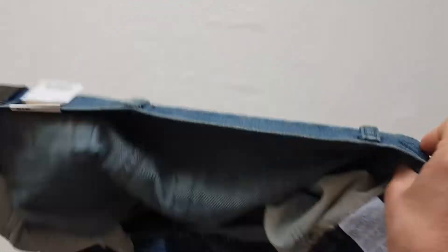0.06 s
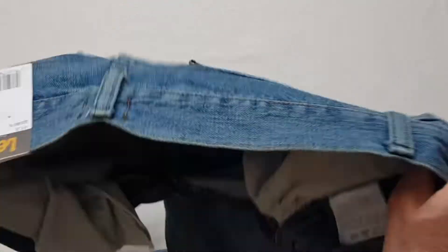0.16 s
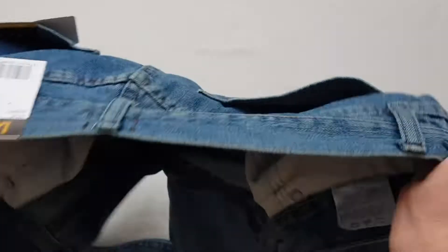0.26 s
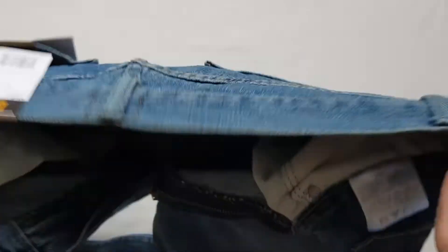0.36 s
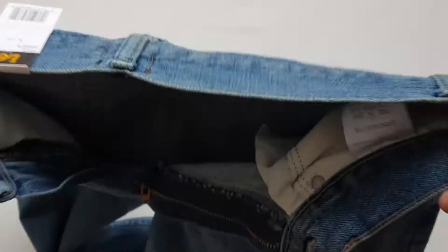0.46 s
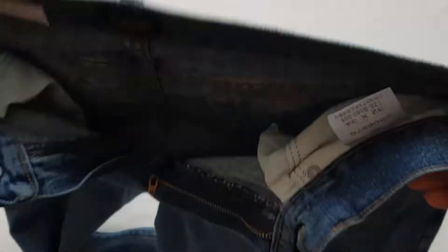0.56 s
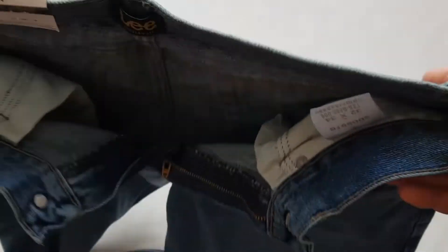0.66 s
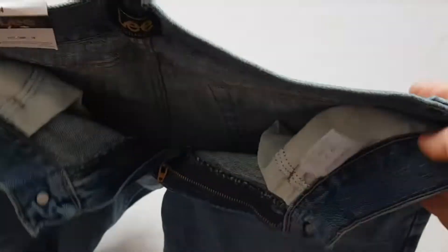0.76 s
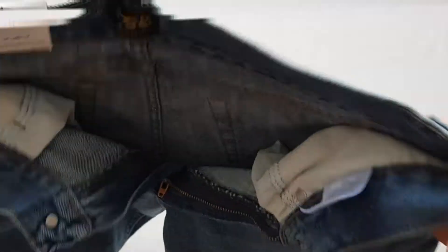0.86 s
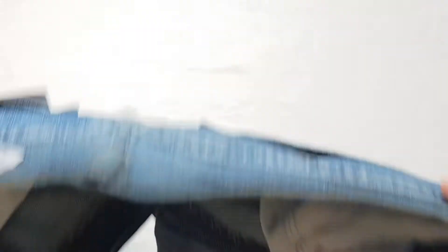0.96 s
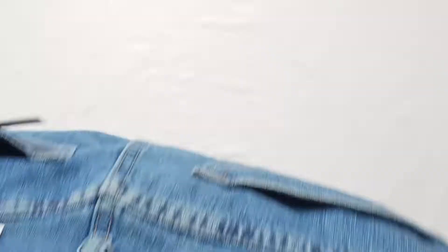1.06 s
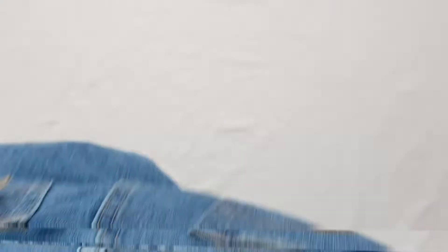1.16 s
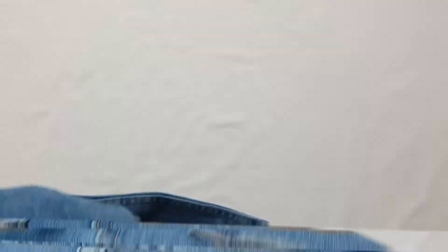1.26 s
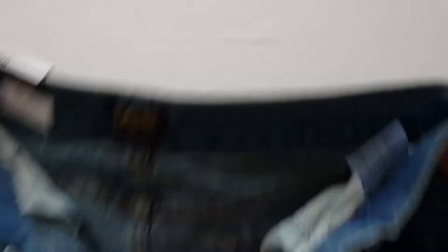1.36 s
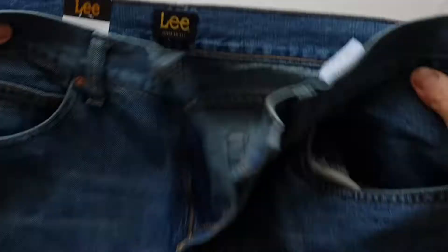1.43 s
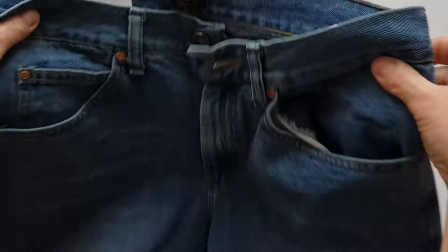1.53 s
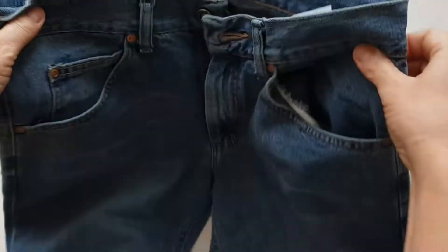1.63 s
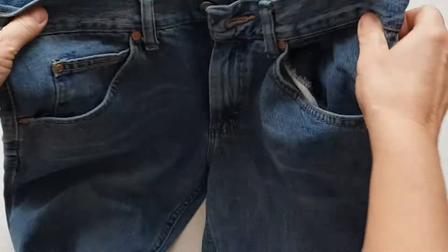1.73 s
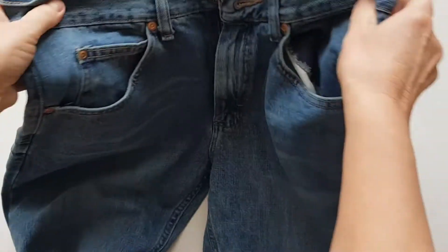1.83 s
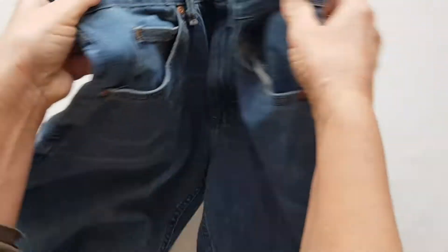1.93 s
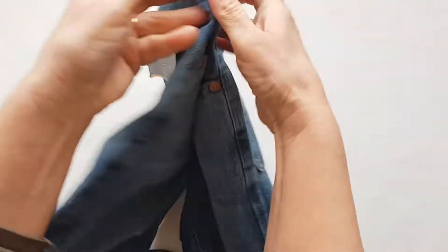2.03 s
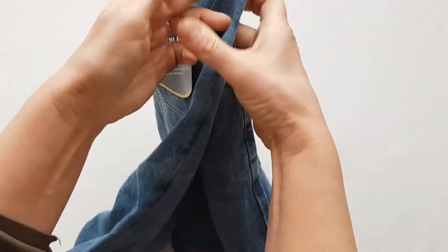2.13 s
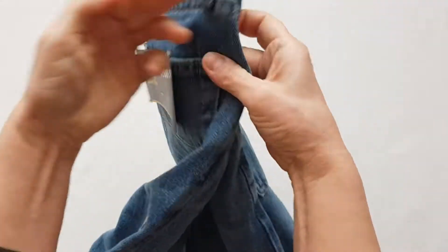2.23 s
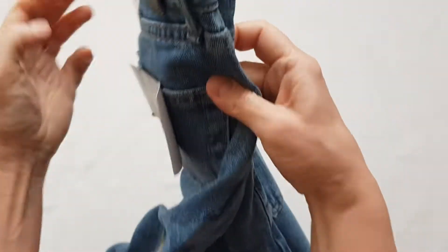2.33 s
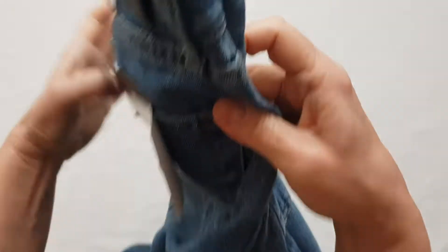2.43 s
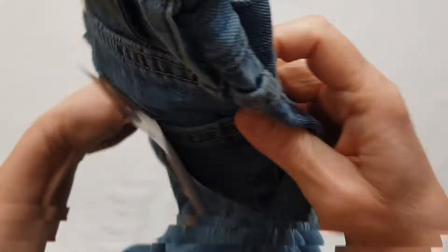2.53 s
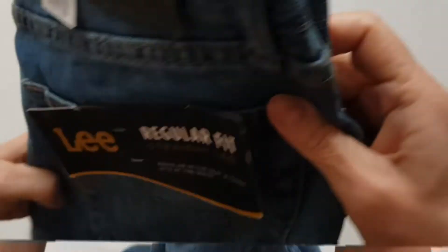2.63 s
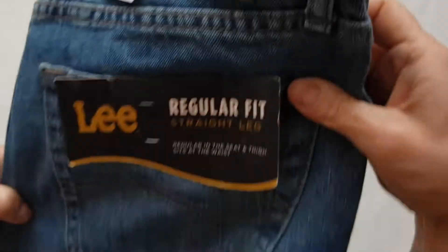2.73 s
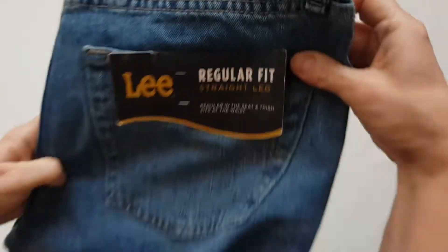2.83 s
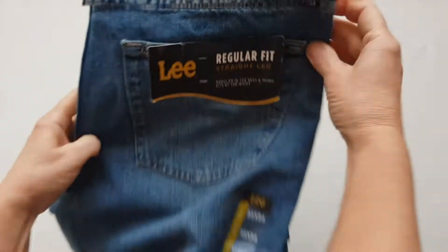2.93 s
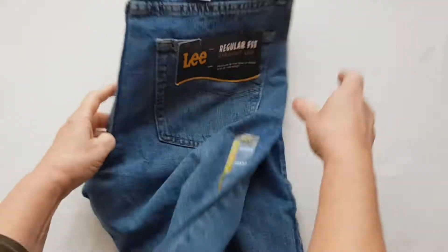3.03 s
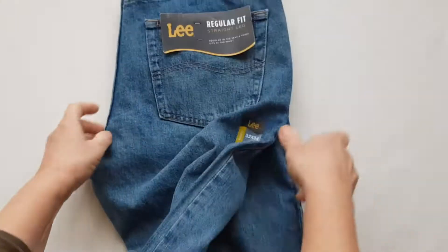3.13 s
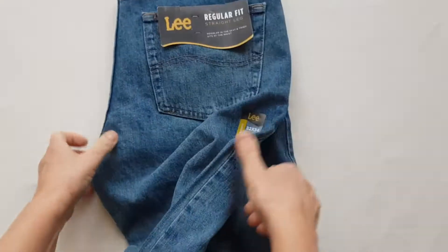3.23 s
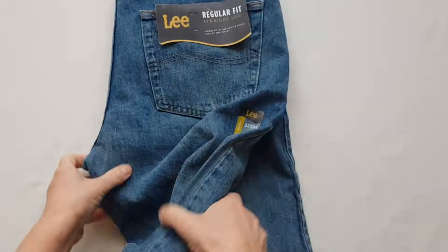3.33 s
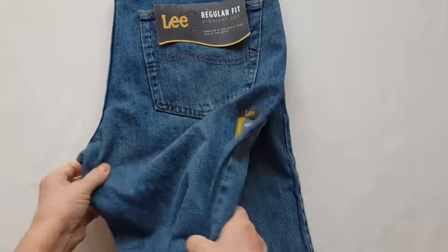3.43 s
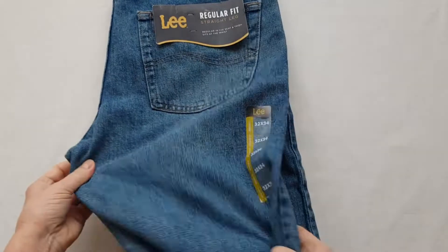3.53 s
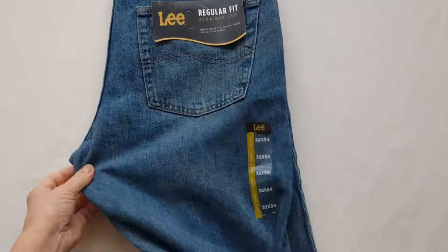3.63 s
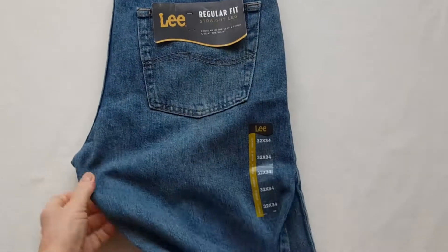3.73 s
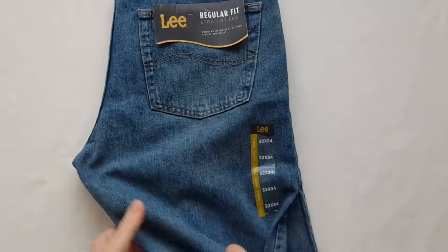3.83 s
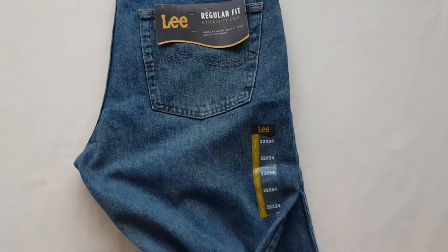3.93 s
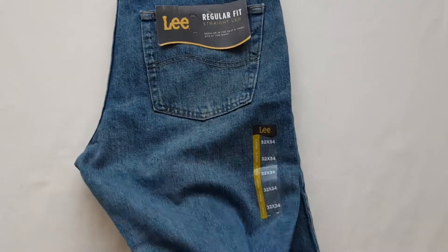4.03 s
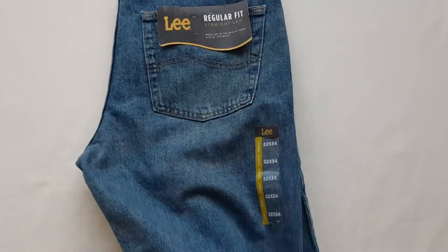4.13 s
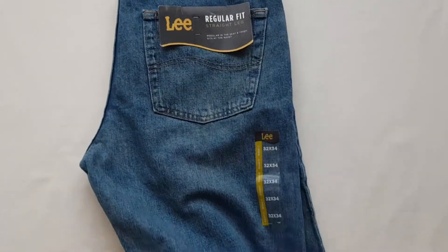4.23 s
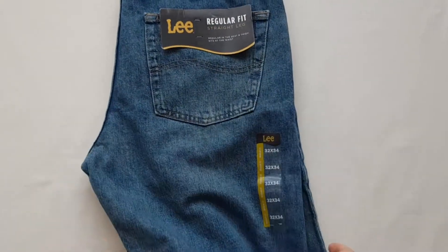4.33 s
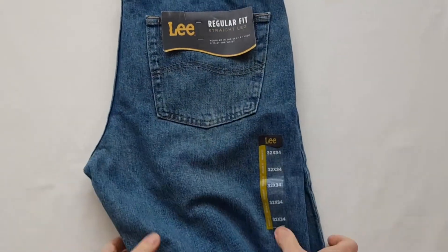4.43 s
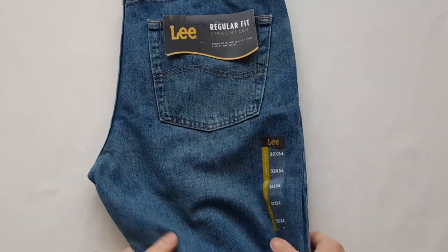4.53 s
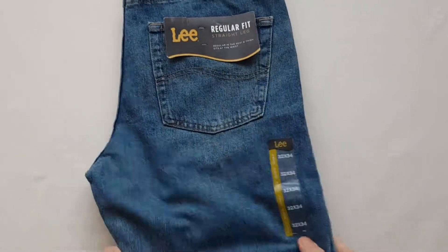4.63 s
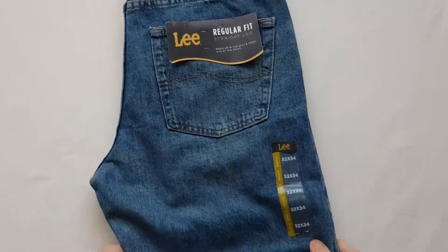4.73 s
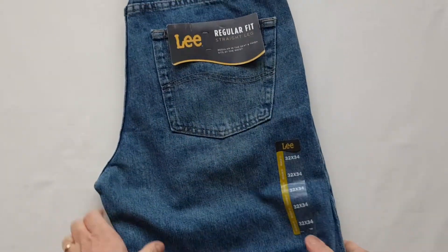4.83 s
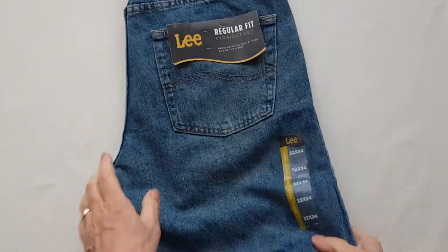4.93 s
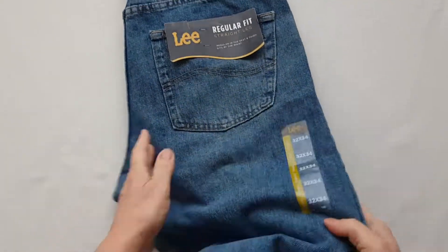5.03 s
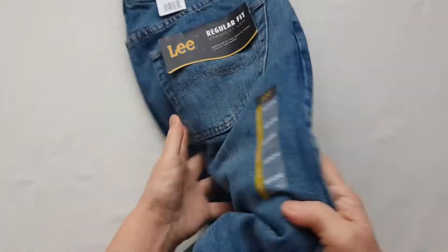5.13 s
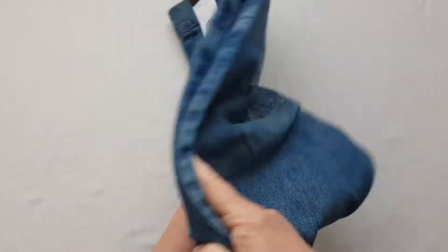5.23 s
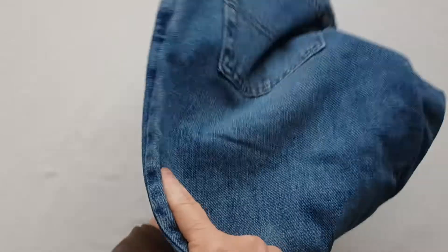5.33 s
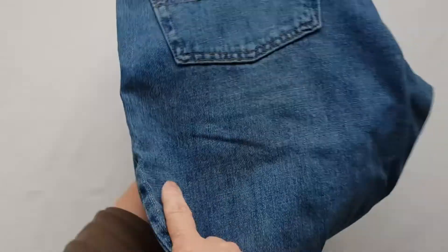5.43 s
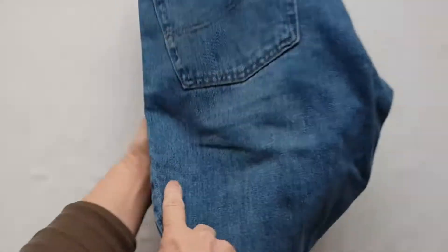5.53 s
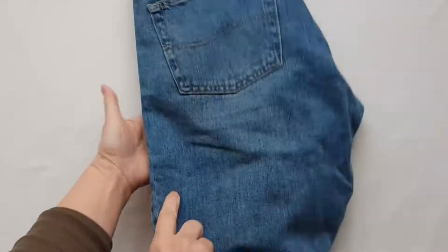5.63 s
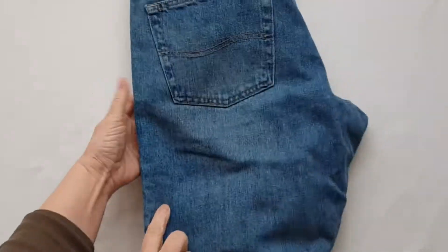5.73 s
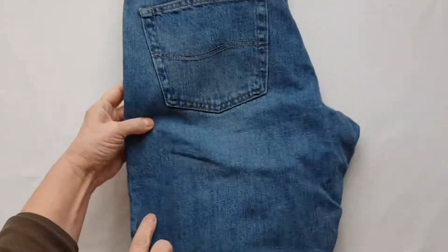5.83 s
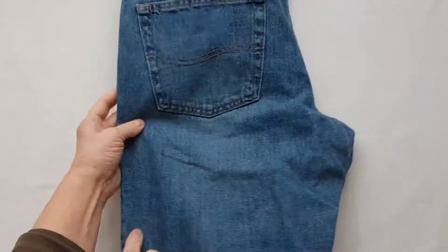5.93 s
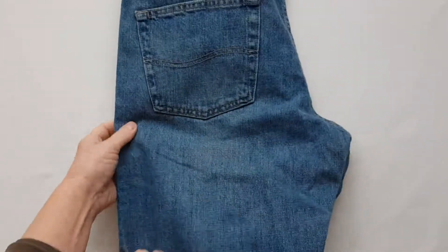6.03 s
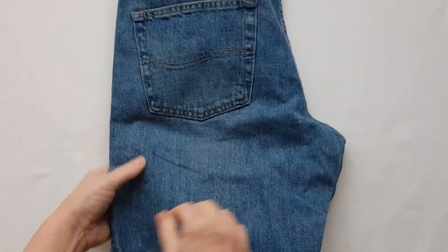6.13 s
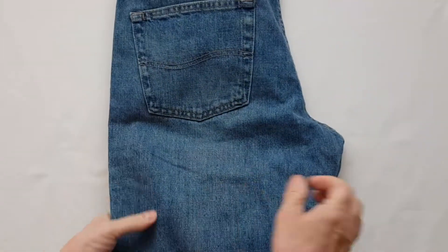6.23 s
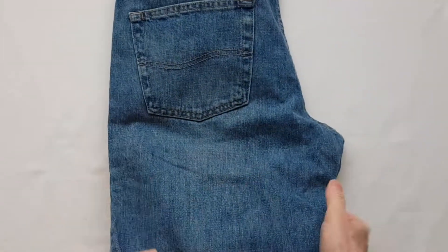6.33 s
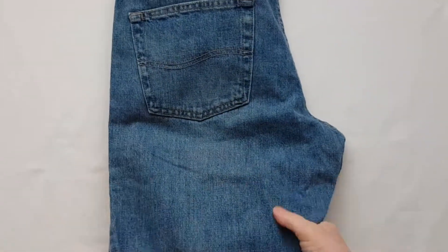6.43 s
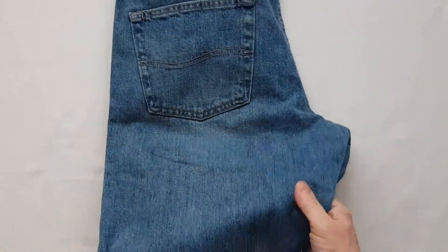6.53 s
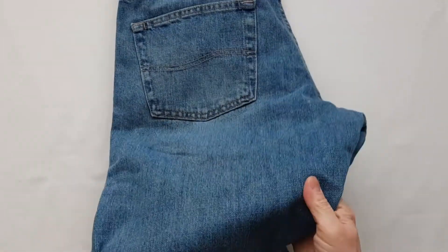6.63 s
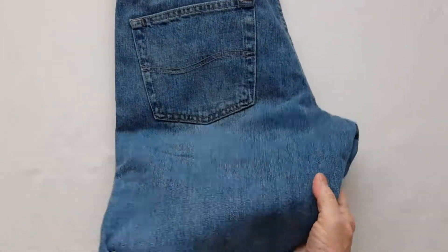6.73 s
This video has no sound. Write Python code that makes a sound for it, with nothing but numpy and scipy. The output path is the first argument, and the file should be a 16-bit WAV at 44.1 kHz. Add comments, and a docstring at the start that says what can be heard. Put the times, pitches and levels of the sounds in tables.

```python
"""Heavy denim on a wooden table

Place: a furnished room with a faint noise floor; microphone: the stereo pair of a camera.
Denim trousers are shaken, folded, dropped and smoothed on the table top. Their weight and the drag of folds
are shaped noise ringing the wood's resonances; scrape, weave hiss and rib rasps are noise heard directly.
Knuckles, folds and seams knock as swelling wavelets; rivets and zip tick as decaying sines with crackle.
The room answers with noise that dies at its own speed at each frequency."""
import sys
import numpy as np
from scipy import signal
from scipy.fft import rfft, irfft, next_fast_len
from scipy.io import wavfile
from scipy.ndimage import uniform_filter1d

SR = 44100
rng = np.random.default_rng(int(sys.argv[2]) if len(sys.argv) > 2 else 0)


def waveform_to_disk(signal):
    """Save audio, clipped to [-1, 1], as 16-bit WAV at the path in sys.argv[1]."""
    frames = np.transpose(np.atleast_2d(signal))
    scaled = np.clip(frames, -1, 1) * 32767
    samples = np.round(scaled).astype(np.int16)
    wavfile.write(sys.argv[1], SR, samples)


def to_linear_factor(level_db):
    """Convert decibel levels (scalar or array-like) to linear amplitude factors."""
    exponent = np.asarray(level_db, float) / 20
    return 10 ** exponent


N = 298998  # samples, 6.78 s

# Event levels stand ahead of the trims in the source functions; spectrum levels are relative.
# The quiet room's spectrum: freq_hz, level_db
HUSH_SPECTRUM = [(15, -32), (25, -28), (97, -1), (226, 7), (296, 8), (1030, -3), (1600, 2.5), (2820, -4),
                 (4860, -38), (6210, -39.5), (12200, -3.5), (15200, -5.5), (16500, -2)]
HUSH_DB = -72
# Decay of the room's echo: freq_hz, t60_s
ROOM_DECAY = [(60, 0.71), (400, 0.37), (1500, 0.47), (4000, 0.39), (12000, 0.073)]
# Likeness of the two channels: freq_hz, correlation (0 to 1)
LIKENESS = [(60, .95), (300, .93), (600, .78), (1500, .12), (4000, 0)]
# Colour difference of the microphone pair: freq_hz, left_over_right_db
MIC_LEAN = [(60, 2.5), (500, 3), (1290, 0), (2400, 1), (4400, 2.5), (8100, 7), (15000, 3.5)]
TOP_HZ = 15770  # nothing is heard above

# Resonances of the table top: pitch_hz, width_hz, level_db
TABLE_MODES = [(56, 13, -1.5), (121.9, 13.2, 9.5), (172.2, 26.2, 2.5), (205.3, 54.6, -1), (246.5, 31, -2),
               (289, 6, 0), (380, 40.6, -4), (505.3, 25.4, -2), (556, 130, -10), (802, 266, -8),
               (1040, 590, -8.5), (1500, 700, -5.5), (2060, 290, -14)]

# Ticks of rivets and zip: start_s, level_db, ring_db and crackle_db (both added to level_db)
TICKS = [(0.0794, -49.5, 10, -2), (0.8984, -64, 15, -8), (1.037, -38, 12, -19), (1.239, -53, 13, -1),
         (1.4618, -36.5, -9, 3), (1.6014, -53, -3, -16), (2.094, -47.5, -6, -26), (3.061, -43.5, -9, -8),
         (3.534, -45, -5, -19)]
# Dull snap, then high ring, of a small metal part: pitch_hz, level_db, t60_s
RIVET_MODES = [(3510, 17, 0.0016), (11200, -3, 0.0053)]
# Rasps across the twill ribs: start_s, length_s, level_db, pitch_hz
RASPS = [(0.71, 0.15, -60.5, 2220), (1.125, .06, -54, 2250), (6.3, 0.17, -65, 1680),
         (1.976, 0.084, -55.5, 1560), (4.445, 0.055, -53.5, 1780), (5.583, 0.041, -47.5, 2300)]

# Knuckles and folds knocking the table: peak_s, level_db, pitch_hz
KNOCKS = [(.02, -30, 350), (.057, -40, 314), (.145, -33, 780), (.149, -36, 365), (.172, -27.5, 386),
          (.186, -36.5, 550), (.285, -39, 385), (.357, -36, 735), (.391, -37.5, 454), (1.17, -47.5, 530),
          (1.42, -51, 614), (1.434, -37, 304), (1.45, -25.5, 302), (1.467, -26, 426), (1.487, -36, 393),
          (2.094, -41.5, 396), (2.544, -27.5, 500), (2.558, -53, 490), (3.028, -32, 457), (3.066, -29, 420),
          (3.086, -32, 438), (3.1, -28.5, 527), (3.115, -28.5, 483), (3.165, -31, 354), (3.533, -16.5, 406),
          (3.612, -31.5, 555), (3.651, -34, 466), (3.71, -40.5, 308), (4.201, -46, 520), (4.565, -37, 624),
          (4.6, -35.5, 780), (4.635, -39.5, 494), (4.66, -39.5, 674), (4.958, -47.5, 500), (5.06, -48, 468),
          (5.623, -33.5, 480), (5.629, -33, 855), (5.64, -24, 376), (5.66, -40, 800), (5.983, -38.5, 388),
          (6.553, -45.5, 520)]
# Stiff seams snapping against the wood: peak_s, level_db
SNAPS = [(0.1733, -42), (1.4656, -24.5), (1.4783, -41), (2.0279, -35), (2.035, -33.5), (2.0954, -34),
         (2.5421, -27.5), (3.0635, -37), (3.102, -30), (3.1162, -27), (3.5339, -32), (3.612, -40),
         (4.4463, -37.5), (4.5636, -37.5), (4.6576, -33.5), (5.6384, -43), (6.354, -42.5), (6.455, -42)]
SNAP_HZ = 1560
RISE_CYCLES = 1.1  # a soft contact peaks after about one cycle of its pitch
# Small knocks of dragged folds: rate, loudest level over the drag, middle pitch
PATTER_PER_S, PATTER_DB, PATTER_HZ = 25, 10.5, 520

# Cloth landing on the table, and slow swells of low rumble while it is handled:
# thud_s, weight_db, air_db, rise_s, fall_s (swells() limits rise and fall)
DROPS_AND_RUMBLE = [(0.011, -37.5, -40, 0.14, 0.17), (0.175, -35.5, -46, 0.044, 0.29),
                    (.217, -53, -32, 0.033, 0.088), (0.329, -40, -44, 0.059, 0.19),
                    (0.699, -65.5, -70.5, 0.57, .8), (1.189, -64, -59, .13, 0.14),
                    (1.365, -47.5, -62, 0.074, 0.03), (1.46, -35, -35.5, 0.11, 0.076),
                    (1.595, -46.5, -63, 0.064, 0.048), (2.0, -47, -60, 0.049, 0.33),
                    (2.543, -54.5, -60, 0.033, 0.35), (3.056, -35.5, -55, 0.053, 0.25),
                    (3.113, -28, -44, 0.1, 0.17), (3.189, -52, -48.5, .08, 0.14),
                    (3.261, -52, -53, 0.068, 0.32), (3.529, -46, -44, 0.038, .07),
                    (3.664, -53, -56, 0.35, 0.19), (4.098, -70, -72, 0.88, .6),
                    (4.433, -55.5, -83, .012, .2), (4.455, -44.5, -75, .04, 0.37),
                    (4.719, -62, -75, 0.23, 1.2), (5.541, -53, -70, .03, .2), (5.642, -33, -62, 0.15, 0.25),
                    (5.685, -45, -41, 0.059, 0.063), (5.778, -47.5, -62, 0.033, 0.2),
                    (5.988, -42, -77, 0.05, 0.26), (6.385, -60, -74, 0.034, .3)]
SETTLE_S, THUD_DB, THUD_HZ = 0.002, 4, 145  # full weight after the thud; thud over the weight
WEIGHT_LOSS_DB, AIR_LOSS_DB = 31.5, 28.5  # lost over one rise or fall
REST_WEIGHT_DB, REST_AIR_DB = -81, -80  # the cloth never lies quite still

# Hands seizing the cloth: peak_s, fall_s, drag_db, scrape_db, hiss_db; the hiss loses 10 dB in a fall
GRABS = [(0.0, 0.055, -27, -43.5, -48.5), (0.174, 0.054, -33.5, -49.5, -66),
         (1.466, 0.032, -30, -41.5, -51), (1.982, 0.079, -48.5, -46, -54.5), (2.092, 0.09, -57, -52, -53.5),
         (2.543, 0.15, -43, -56, -63.5), (3.029, 0.22, -38.5, -77, -107), (3.537, 0.014, -33.5, -55, -53),
         (4.431, 0.094, -49.5, -49.5, -62), (5.623, 0.072, -35.5, -50.5, -66),
         (6.359, 0.23, -54.5, -82, -86)]
GRAB_RISE_S = 0.0038
# Cloth sliding over cloth and table: peak_s, rise_s, drag_db, scrape_db, hiss_db
SLIDES = [(.122, 0.15, -56, -55, -55.5), (.291, 0.13, -46.5, -57.5, -57.5), (.41, 0.085, -51.5, -60, -64),
          (.559, 0.4, -67, -68, -64.5), (0.768, 0.083, -69.5, -55.5, -53.5), (1.04, 0.036, -65, -65, -67),
          (1.146, 0.2, -62, -56.5, -53.5), (1.365, 0.082, -53, -53.5, -53),
          (1.435, 0.053, -47, -54.5, -53.5), (1.608, 0.093, -46, -54.5, -58), (1.945, 0.21, -73, -76, -66),
          (2.032, 0.09, -51.5, -54, -56.5), (2.233, 0.058, -63.5, -61.5, -57.5),
          (2.505, 0.16, -59, -67.5, -65), (2.678, .11, -56.5, -56.5, -55), (2.917, 0.14, -63, -65.5, -60),
          (3.069, 0.044, -30, -46.5, -54.5), (3.09, 0.038, -36, -49.5, -65),
          (3.118, 0.045, -35, -46.5, -58.5), (3.302, 0.061, -55, -70, -83), (3.39, 0.088, -62, -64, -60.5),
          (3.537, 0.14, -56, -55, -56), (3.648, 0.11, -54, -65, -65), (3.931, 0.12, -62, -62.5, -60),
          (4.083, 0.3, -61, -65.5, -61.5), (4.234, 0.056, -59.5, -63, -57.5), (4.568, 0.14, -52, -64, -65),
          (4.698, 0.084, -63, -60, -58), (4.9, 0.1, -61.5, -87, -94), (5.049, 0.091, -53.5, -81, -76),
          (5.157, 0.23, -54, -52.5, -58), (5.29, 0.042, -59, -69, -71), (5.43, 0.062, -58.5, -73, -69),
          (5.577, 0.11, -54.5, -62, -63), (5.65, 0.066, -40, -54.5, -60), (5.81, 0.29, -58.5, -69.5, -63.5),
          (5.994, 0.13, -56.5, -60.5, -61), (6.335, 0.051, -91, -87, -72), (6.51, 0.35, -61, -62.5, -60.5),
          (6.72, 0.23, -60.5, -78, -65)]
SLIDE_TAIL, SLIDE_BEND = 0.99, 1.235  # fall over rise; a bend over 1 rounds the top and steepens the ends
DRAG_SWING, SCRAPE_SWING = 1.916, 1.856  # dB these layers lose for each dB of the hiss

# Air push and deepest rumble: freq_hz, level_db
AIR_SPECTRUM = [(20, -31), (38, 0), (60, 7.5), (95, -3.5), (125, -40)]
# Weight of the cloth, ahead of the table: freq_hz, level_db
WEIGHT_SPECTRUM = [(55, -27), (90, 1.5), (180, -5.5), (260, 2), (330, -15)]
# Dragged folds, ahead of the table: freq_hz, level_db
DRAG_SPECTRUM = [(140, -17), (255, 0), (600, 1), (1000, 4), (1400, -20)]
# Scraping seams: freq_hz, level_db
SCRAPE_SPECTRUM = [(470, -35), (800, -22), (1100, -12.5), (1180, -15), (1420, -10.5), (2800, -18.5),
                   (3200, -18.5), (4160, -22.5), (7040, -120)]
# Hiss of the weave: freq_hz, level_db
WEAVE_SPECTRUM = [(1650, -36), (2800, -30), (3400, -1), (4440, 5), (5840, 0.5), (6570, -0.5), (7400, 0.5),
                  (9050, 3), (10300, -1), (11700, 2), (15100, -5), (16100, 14.5), (16500, -70)]


def unit(x):
    """Scales x to rms 1."""
    return x / np.sqrt(np.mean(x ** 2) + 1e-20)


def along(points, hz):
    """Reads (Hz, value) points on a log frequency axis."""
    f, v = np.transpose(points)
    return np.interp(np.log(hz + 1), np.log(f + 1), v)


def spectrum(points):
    """Turns (Hz, dB) points into a gain as a function of frequency."""
    return lambda hz: to_linear_factor(along(points, hz))


def filtered(x, response):
    """Multiplies the spectrum of x by a response of frequency, real or complex."""
    m = next_fast_len(N + SR // 2)
    return irfft(rfft(x, m) * response(np.fft.rfftfreq(m, 1 / SR)), m)[..., :N]


def mid_side_gains(hz):
    """Gains of independent mid and side noise that give the channels their likeness."""
    turn = np.arccos(np.clip(along(LIKENESS, hz), -1, 1)) / 2
    return np.cos(turn), np.sin(turn)


def catches(rate, fade):
    """Sudden catches, rate times a second, let go over fade seconds: a curve of mean 0, rms 1."""
    starts = (rng.random(N) < rate / SR) * rng.exponential(size=N)
    held = np.sqrt(signal.lfilter([1], [1, -np.exp(-1 / (fade * SR))], starts))
    return unit(held - held.mean())


def friction(colour, grain_db, patchy_db):
    """Stereo noise of rms 1: catches lift it (negative grain dips it), in patches of random gain."""
    grainy = rng.standard_normal((2, N)) * to_linear_factor(grain_db * catches(rate=110, fade=0.014))
    z = signal.stft(grainy, nperseg=512)[2]
    field = rng.standard_normal(z.shape[1:])
    field = uniform_filter1d(uniform_filter1d(field, 12, 0), 12, 1)  # over frequency, then time
    pair = signal.istft(z * to_linear_factor(patchy_db * unit(field)), nperseg=512)[1][:, :N]
    mid, side = filtered(pair, lambda hz: colour(hz) * np.array(mid_side_gains(hz)))
    return unit(np.array([mid + side, mid - side]))


def swells(s, db, rise, fall, drop_db, bend=1):
    """Gain of overlapping movements, each losing drop_db over its rise before and its fall after the peak."""
    t = np.arange(0, N / SR + .002, .001)[:, None]
    before = (s - t) / np.clip(rise, .002, 1)  # rise and fall limited to 2 ms .. 1 s
    after = (t - s) / np.clip(fall, .002, 1)
    away = np.where(t < s, before, after)
    gain = np.sqrt(np.sum(to_linear_factor(db - drop_db * away ** bend) ** 2, axis=1))
    return np.interp(np.arange(N) / SR, t[:, 0], gain)


def hush():
    """The quiet room: steady coloured noise with small sudden dips."""
    return to_linear_factor(HUSH_DB) * friction(spectrum(HUSH_SPECTRUM), grain_db=-5.5, patchy_db=-0.5)


def room(x):
    """Echo: noise in which each frequency dies at its own speed, tails alike in both channels as LIKENESS says."""
    hz, t, z = signal.stft(rng.standard_normal((2, SR)), SR, nperseg=512)
    mid_gain, side_gain = mid_side_gains(hz)
    mid, side = z[0] * mid_gain[:, None], z[1] * side_gain[:, None]
    decay = to_linear_factor(-60 * t / along(ROOM_DECAY, hz)[:, None])
    tail = signal.istft(np.array([mid + side, mid - side]) * decay, SR, nperseg=512)[1]
    delayed = np.pad(x, (350, 0))[None]  # 8 ms further on than the direct sound
    return signal.fftconvolve(delayed, tail / np.linalg.norm(tail[0]), axes=1)[:, :N]


def table(f):
    """Response of the table top: a sum of resonances alternating in sign."""
    total = 0
    for k, (pitch, width, db) in enumerate(TABLE_MODES):
        resonance = 1j * f * width / (pitch * pitch - f * f + 1j * f * width)
        total = total + (-1) ** k * to_linear_factor(db) * resonance
    return total


def ticks():
    """Small metal parts click: a dull snap and a thin high ring, with crackle that dies in a few ms."""
    out, t = np.zeros((2, N + 600)), np.arange(600) / SR
    onset = 1 - np.exp(-t / 0.00018)
    snap, ring = [to_linear_factor(level - 60 * t / t60) * onset * np.sin(2 * np.pi * hz * t)
                  for hz, level, t60 in RIVET_MODES]
    for s, db, ring_db, crackle_db in TICKS:
        crackle = np.diff(rng.standard_normal((2, 601)))  # brightened noise
        crackle = to_linear_factor(crackle_db - 60 * t / 0.014) * crackle
        out[:, round(s * SR):][:, :len(t)] += to_linear_factor(db) * (snap + to_linear_factor(ring_db) * ring + crackle)
    return out[:, :N]


def rasps():
    """A fingernail or seam runs across the twill ribs: a short, narrow, gritty band."""
    t, out = np.arange(N) / SR, np.zeros((2, N))
    for s, length, db, hz in RASPS:
        attack = np.clip((t - s) / 0.0014, 0, 1)
        release = np.clip((s + length - t) / (0.69 * length), 0, 1)
        band = lambda f: 1 / (1 + ((f - hz) / (.13 * hz)) ** 2)
        out += to_linear_factor(db) * attack * release * friction(band, grain_db=3.5, patchy_db=0)
    return out


def rubbing():
    """Gains of drag, scrape and hiss: grabs start almost at once, slides swell and fade."""
    grab_s, grab_fall, *grab_db = np.transpose(GRABS)
    slide_s, slide_rise, *slide_db = np.transpose(SLIDES)
    gains = []
    for g, d, swing in zip(grab_db, slide_db, (DRAG_SWING, SCRAPE_SWING, 1)):
        grabs = swells(grab_s, g, GRAB_RISE_S, grab_fall, 10 * swing)
        slides = swells(slide_s, d, slide_rise, SLIDE_TAIL * slide_rise, 10 * swing, SLIDE_BEND)
        gains.append(np.hypot(grabs, slides))
    return gains


def knocks():
    """Each padded blow is a swelling wavelet, heard directly and through the table ringing near its pitch."""
    blows, t = np.zeros(N + 2048), np.arange(2048) / SR
    events = [(s, to_linear_factor(db), hz) for s, db, hz in KNOCKS]
    events += [(s, to_linear_factor(db + THUD_DB), THUD_HZ) for s, db, *_ in DROPS_AND_RUMBLE]
    events += [(s, to_linear_factor(db), SNAP_HZ) for s, db in SNAPS]
    drag = rubbing()[0]
    for u, v, w in rng.random((round(PATTER_PER_S * N / SR), 3)):  # chance of time, level, pitch
        gain = to_linear_factor(PATTER_DB - 23 * v) * drag[int(u * N)]
        events.append((0.018 + u * (N / SR - .03), gain, PATTER_HZ * 3 ** (w - .5)))
    for s, gain, hz in events:
        rise = RISE_CYCLES / hz
        swell = (t / rise * np.exp(1 - t / rise)) ** 2
        start = max(round((s - rise) * SR), 0)
        blows[start:][:len(t)] += gain * swell * np.cos(2 * np.pi * hz * t)
    blows = blows[:N]
    return to_linear_factor(-3.5) * blows + to_linear_factor(-3.0) * filtered(blows, table)


def cloth():
    """Moving denim: weight and drag ring the table; air push, scrape and hiss are heard directly."""
    s, weight_db, air_db, rise, fall = np.transpose(DROPS_AND_RUMBLE)
    peak = s + SETTLE_S
    weight = np.hypot(to_linear_factor(REST_WEIGHT_DB), swells(peak, weight_db, rise, fall, WEIGHT_LOSS_DB))
    air = np.hypot(to_linear_factor(REST_AIR_DB), swells(peak, air_db, rise, fall, AIR_LOSS_DB))
    drag, scrape, hiss = rubbing()
    shaking = to_linear_factor(-0.5) * weight * friction(spectrum(WEIGHT_SPECTRUM), grain_db=0.0, patchy_db=-4)
    shaking += to_linear_factor(8) * drag * friction(spectrum(DRAG_SPECTRUM), grain_db=2.5, patchy_db=-2.0)
    direct = air * friction(spectrum(AIR_SPECTRUM), grain_db=5, patchy_db=-2)
    direct += scrape * friction(spectrum(SCRAPE_SPECTRUM), grain_db=2.0, patchy_db=1.32)
    direct += hiss * friction(spectrum(WEAVE_SPECTRUM), grain_db=1.0, patchy_db=2.0)
    return direct + filtered(shaking, table)


def scene():
    """Cloth, rasps, knocks and ticks, their echo and the quiet room."""
    hits = knocks() + ticks()
    rustle = cloth() + rasps()
    echo = room(to_linear_factor(-9) * hits.mean(0) + to_linear_factor(-13) * rustle.mean(0))
    return hits + rustle + echo + hush()


def low_pass(x):
    """Removes everything above the highest recorded frequency."""
    return signal.sosfilt(signal.butter(12, 16970, fs=SR, output="sos"), x)


def record(dry):
    sides = np.array([[.5], [-.5]])  # left, right
    mix = filtered(dry, lambda hz: to_linear_factor(sides * along(MIC_LEAN, hz)) * (hz < TOP_HZ))
    return low_pass(mix)


dry = scene()
out = record(dry)
waveform_to_disk(out)
```